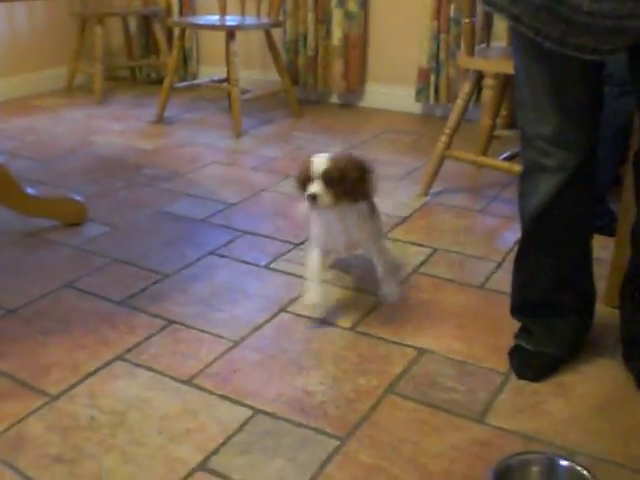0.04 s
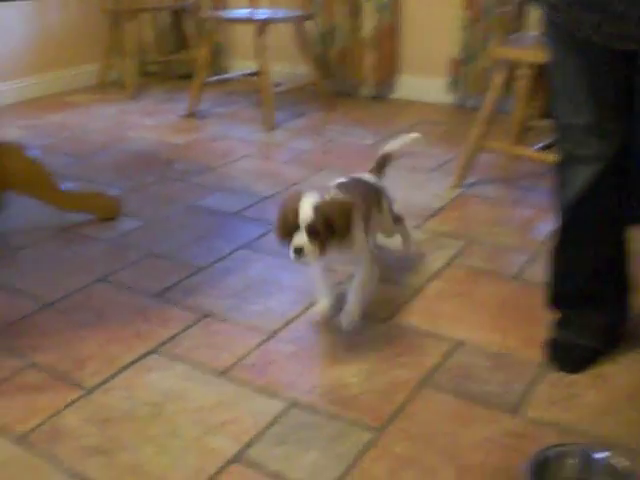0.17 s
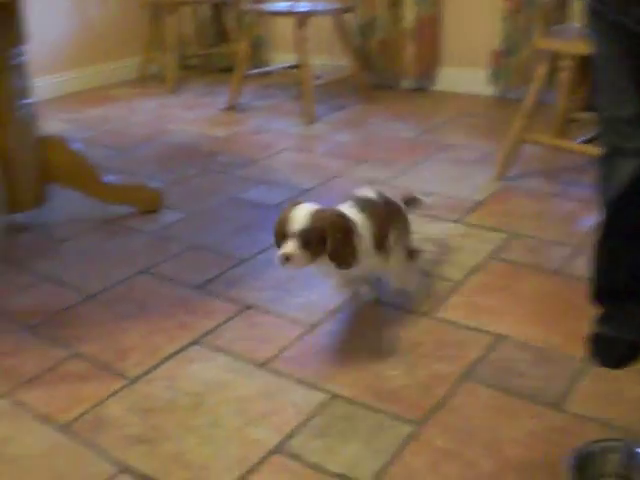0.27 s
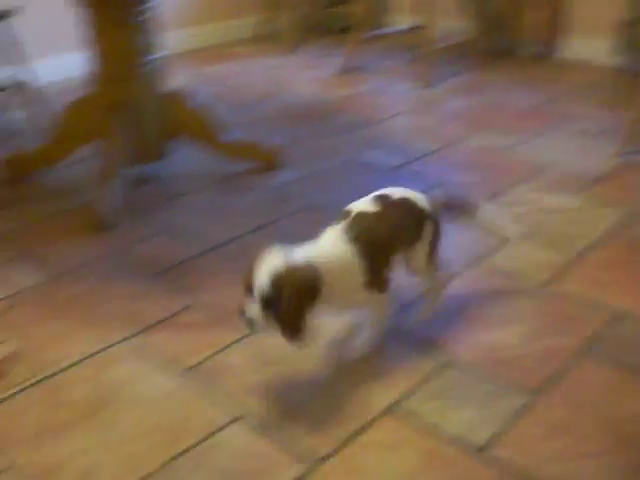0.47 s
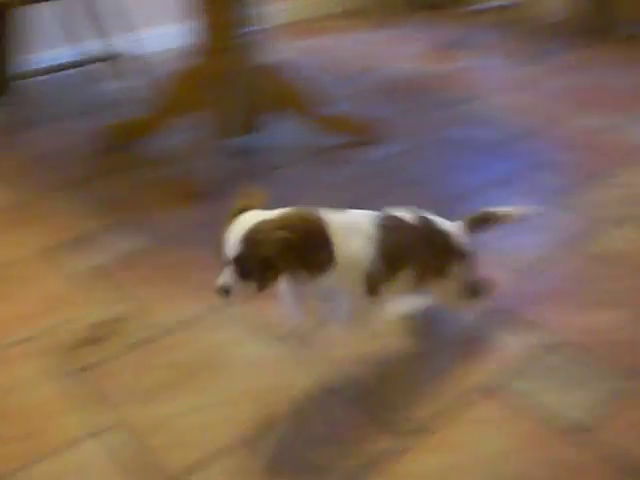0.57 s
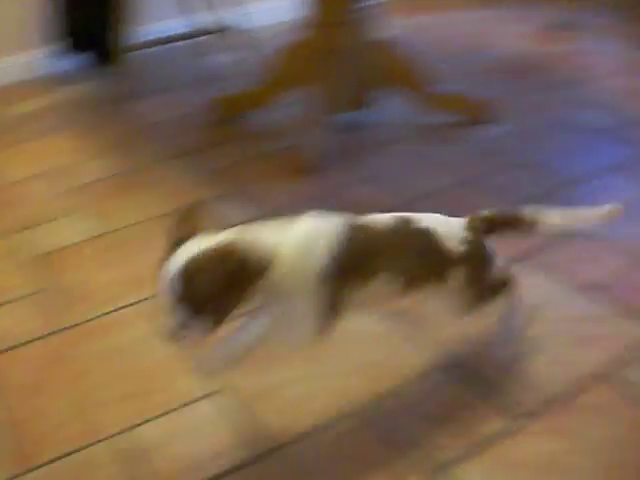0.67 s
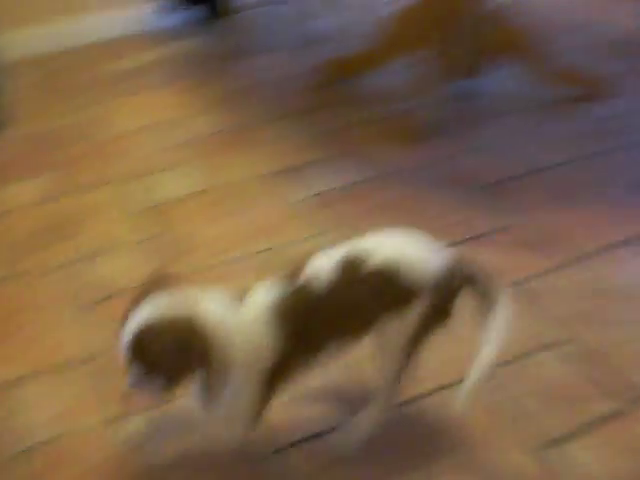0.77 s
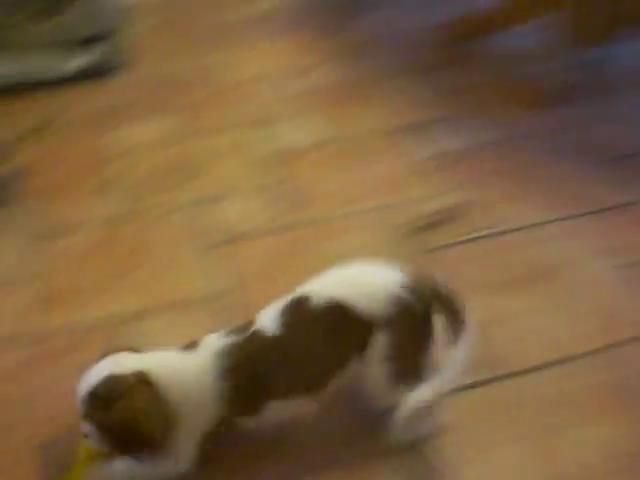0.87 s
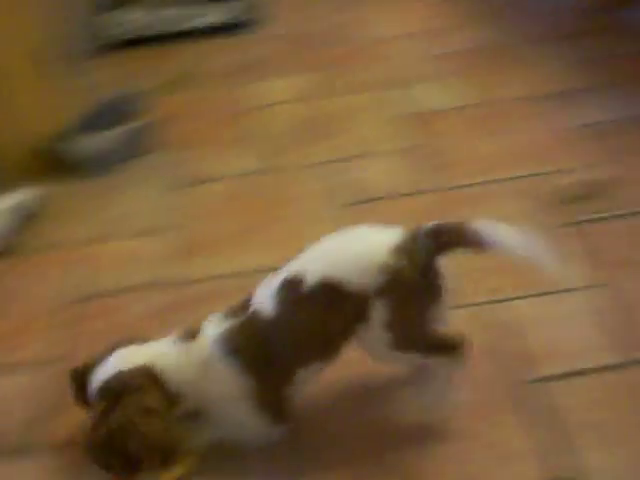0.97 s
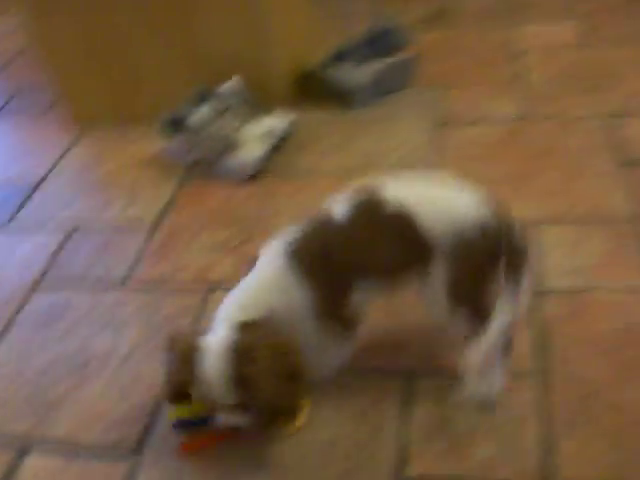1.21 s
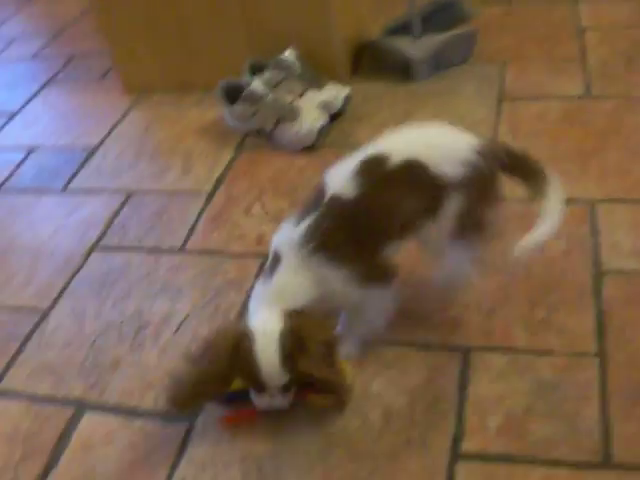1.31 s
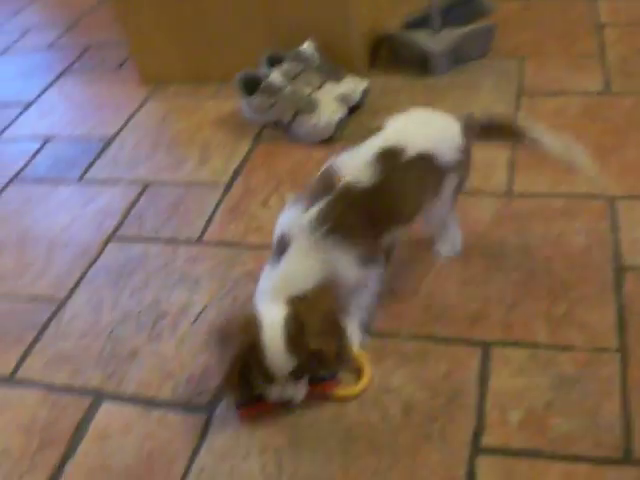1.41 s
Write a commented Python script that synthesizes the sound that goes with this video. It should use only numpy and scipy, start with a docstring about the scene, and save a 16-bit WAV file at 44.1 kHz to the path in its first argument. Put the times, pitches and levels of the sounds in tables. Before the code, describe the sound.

A bunch of keys jingles briefly in the air and lands on a tile floor with a sharp clatter that rings in the room. A puppy follows with soft paw thuds, skids and claw ticks, over a faint hum.

```python
"""Puppy chasing tossed keys

A bunch of keys, probably a plastic toy, jingles through the air and lands on kitchen tiles in a quick
run of hard clacks; the live room rings on. A puppy gives chase: paws thud and skid, claws tick, and
it noses the bunch over the floor. A small camera whines faintly close by."""
import sys
import numpy as np
from scipy import signal
from scipy.fft import rfft, irfft
from scipy.io import wavfile

SR = 44100
rng = np.random.default_rng(int(sys.argv[2]) if len(sys.argv) > 2 else 0)


def pcm_store(signal):
    """Save signal as 16-bit PCM."""
    levels = np.round(np.clip(np.atleast_2d(signal), -1, 1) * 32767)
    wavfile.write(sys.argv[1], SR, levels.astype(np.int16).T)


N = 63945


def undb(db):
    return 10 ** (np.asarray(db) / 20)


def since(start):
    """Seconds since start, zero before it."""
    return np.maximum(np.arange(N) / SR - start, 0)


def decay(start, seconds):
    """Envelope with an instant attack and an exponential tail, down to 1/e after `seconds`."""
    t = since(start)
    return (t > 0) * np.exp(-t / seconds)


def along(hz, points):
    """Read (Hz, value) points on a log-frequency axis."""
    freqs, values = np.array(sorted(points)).T
    return np.interp(np.log(np.maximum(hz, 1)), np.log(freqs), values)


def eq(x, points):
    """Minimum-phase EQ through (Hz, dB) points, scaled to keep the power of white noise."""
    size = 4096
    gain = undb(along(np.linspace(0, SR / 2, size // 2 + 1), points))
    cepstrum = irfft(np.log(gain))
    causal_fold = 1 + np.sign(size // 2 - np.arange(size))
    causal_fold[0] = 1
    impulse = irfft(np.exp(rfft(cepstrum * causal_fold)))
    return signal.fftconvolve(x, impulse / np.linalg.norm(impulse))[:N]


def noise():
    return rng.standard_normal(N)


def ring(start, hz, t60):
    """One struck mode; a small object radiates little below its pitch."""
    mode = np.sin(2 * np.pi * hz * since(start)) * decay(start, t60 / np.log(1000))
    return signal.lfilter(*signal.butter(2, hz / 4, "high", fs=SR), mode)


def grit(grains_per_s=8000):
    """Dense tiny contacts of uneven size, rms 1."""
    grains = (rng.random(N) < grains_per_s / SR) * noise()
    grains *= undb(np.minimum(rng.exponential(size=N), 3))  # each grain gets up to 3 dB extra
    return grains / grains.std()


# EQ of the room tone (frequency [Hz], gain [dB])
ROOM_TONE_EQ = [(25, -9), (60, -6.5), (115, -2.5), (165, -6), (260, -3.5), (700, -2), (1350, -9.5),
                (2100, -15), (2800, -9.5), (5300, -15.5), (7500, -14.5), (15500, -15)]
# Steady partials of the hum and whine (frequency [Hz], level [dB])
HUM_PARTIALS = [(120, -67.5), (242, -64.5), (1373, -69.5), (1464, -85)]

def ambience(room_tone_db=-52):
    """The bed: room tone with a faint hum and the camera's whine."""
    hum = sum(undb(db) * np.sqrt(2) * np.sin(2 * np.pi * (hz * since(0) + rng.random()))
              for hz, db in HUM_PARTIALS)
    return undb(room_tone_db) * eq(noise(), ROOM_TONE_EQ) + hum


# Soft footfalls and bumps (time [s], level [dB], band centre [Hz], decay [s])
PAW_THUDS = [(.004, -61, 48, .06), (0.014, -53, 193, 0.042), (.552, -50, 179, 0.036),
             (0.821, -47.5, 175, 0.036), (.85, -48.5, 84, 0.03), (.869, -35, 540, 0.013),
             (0.871, -42, 219, 0.037), (0.884, -38, 245, 0.017), (1.14, -58, 227, 0.037),
             (1.429, -52, 242, .018)]

def paw_thuds(attack_s=0.0017, edge_ratio=1.36):
    """Soft paws hit the floor, each a dull burst of low band-passed noise."""
    out = np.zeros(N)
    for start, db, hz, decay_s in PAW_THUDS:
        band = signal.butter(2, [hz / edge_ratio, hz * edge_ratio], "band", fs=SR, output="sos")
        body = signal.sosfilt(band, noise())
        envelope = (1 - np.exp(-since(start) / attack_s)) * decay(start, decay_s)
        out += undb(db) * body / body.std() * envelope
    return out


# Paws and keys sliding (time [s], length [s], scrape level [dB], hiss level [dB])
SKIDS = [(0.02, 0.034, -54.5, -46.5), (0.054, 0.07, -59, -43.5), (0.089, 0.042, -44.5, -52),
         (0.139, 0.078, -56.5, -44), (0.641, 0.052, -53.5, -51), (0.822, 0.055, -47, -42),
         (0.865, 0.069, -47, -38.5), (0.911, 0.055, -43, -53), (0.958, 0.084, -45.5, -47.5),
         (1.014, 0.06, -43, -41), (1.062, 0.15, -52.5, -48.5), (1.192, .11, -57.5, -51),
         (1.287, 0.08, -52.5, -51.5), (1.409, 0.1, -56.5, -54)]
# Midrange body of a skid (frequency [Hz], gain [dB])
SCRAPE_EQ = [(100, -10), (300, -6.5), (800, 0), (2300, 0), (5000, -5), (7500, -23), (15000, -42)]
# Airy top of a skid (frequency [Hz], gain [dB])
HISS_EQ = [(1000, -19), (4000, 1), (7000, -3.5), (10500, -0.5), (13000, -2), (15500, -0.5)]

def skids(attack_s=0.0079, release_s=0.024):
    """Friction on tile: a gritty scrape layered with a fine hiss, both riding each push."""
    scrape_envelope, hiss_envelope = np.zeros(N), np.zeros(N)
    for start, length, scrape_db, hiss_db in SKIDS:
        attack = 1 - np.exp(-since(start) / attack_s)
        release = np.exp(-since(start + length - release_s) / release_s)
        scrape_envelope += undb(scrape_db) * attack * release
        hiss_envelope += undb(hiss_db) * attack * release
    scrape = eq(scrape_envelope * grit(), SCRAPE_EQ)
    hiss = eq(hiss_envelope * (grit() + noise()) / np.sqrt(2), HISS_EQ)
    return scrape + hiss


# Keys touching in mid-air (time [s], level [dB], decay [s])
KEY_JINGLES = [(.0752, -27.5, 0.0034), (0.0785, -32, 0.0036), (.1438, -26, 0.0022)]
# Sparkle of the jingle (frequency [Hz], gain [dB])
JINGLE_EQ = [(3000, -22), (7000, -25), (9000, -7.5), (10700, -3.5), (13000, -12), (15500, -4)]

def key_jingles():
    """The flying keys brush each other in thin, bright rattles."""
    envelope = sum(undb(db) * decay(start, decay_s) for start, db, decay_s in KEY_JINGLES)
    return eq(grit() * envelope, JINGLE_EQ)


# Claws and keys tapping the floor (time [s], level [dB], pitch [Hz], crack offset [dB])
TILE_TICKS = [(.0985, -48, 900, -12), (.569, -35, 1460, -11), (.743, -32, 2040, -9), (.821, -34, 4540, 4),
              (.8232, -29, 3130, -16), (.873, -22, 2290, -13), (0.8988, -25, 3900, 12.5),
              (.903, -32, 3000, -3), (.9135, -23, 5940, -11), (.921, -25, 3400, 8), (1.0075, -28, 3200, -6),
              (1.016, -25, 2400, -2.5), (1.0312, -18.5, 2380, -8), (1.1095, -26, 1830, -12),
              (1.329, -35, 2980, -12), (1.4368, -28, 3280, -16)]
# Snap of a hard hit on tile, shared with the landing (frequency [Hz], gain [dB])
CRACK_EQ = [(100, -30.5), (600, -12), (1500, -1.5), (8000, 1), (11000, -3.5), (15500, -3)]

def tile_ticks(ring_t60_s=0.0034, crack_decay_s=0.0002):
    """Claws and keys make tiny hard contacts: a noise crack and a few cycles of ring."""
    rings, crack_envelope = np.zeros(N), np.zeros(N)
    for start, db, hz, crack_db in TILE_TICKS:
        rings += undb(db) * ring(start, hz, ring_t60_s)
        crack_envelope += undb(db + crack_db) * decay(start, crack_decay_s)
    return rings + eq(crack_envelope * noise(), CRACK_EQ)


# Keys striking the tile (time [s], level [dB], pitch [Hz], ring T60 [s], crack offset [dB])
KEY_CLACKS = [(0.2163, -13, 2600, 0.0008, -24), (0.2225, -10, 3720, 0.0021, -12),
              (0.2337, 3.5, 6720, 0.0029, -2), (0.2362, -16, 7030, 0.0023, 11),
              (0.2417, -5, 3400, 0.0057, -8), (0.2439, -12, 2840, 0.0067, -7),
              (.2481, -7.5, 6600, 0.0057, -12), (0.2511, -11, 3170, .006, -25),
              (0.2543, -11.5, 6200, 0.0052, 0)]
# Resonances of the bunch (frequency [Hz], relative level [dB], T60 [s])
BUNCH_MODES = [(1540, -29, 0.019), (2700, -9, .03), (3050, 15, 0.032), (3250, 13, 0.034), (3650, -14, .03),
               (3730, -18, .025), (5050, -12, .03), (6250, -9, .025), (6200, 14, 0.021), (8800, -16, .02),
               (9100, -11, .025)]
# EQ of the keys rattling together from the first touch on (frequency [Hz], gain [dB])
CHATTER_EQ = [(100, -19.5), (500, -5.5), (1300, 0), (3500, -0.5), (6000, -5.5), (9000, -3), (15500, -15)]
# Reverb-send EQ: what the hits throw into the room (frequency [Hz], gain [dB])
HIT_SEND_EQ = [(60, -31), (200, -13.5), (500, -14), (850, -7), (1220, -13.5), (1700, -8), (2000, -12.5),
               (2650, -3), (3300, 2), (3950, 2), (4700, -5.5), (5700, -2), (7500, -13.5), (9400, -5.5),
               (12000, -12.5), (15500, -20)]

def key_landing(crack_decay_s=0.00057, chatter_db=-24.5, chatter_decay_s=0.036,
                modes_db=-40.5, hit_send_db=8):
    """Each key cracks on the tile and rings briefly; the bunch chatters, resonates and fills the room."""
    rings, crack_envelope, hits = np.zeros(N), np.zeros(N), np.zeros(N)
    for start, db, hz, t60, crack_db in KEY_CLACKS:
        rings += undb(db) * ring(start, hz, t60)
        crack_envelope += undb(db + crack_db) * decay(start, crack_decay_s)
        hits[int(start * SR)] += undb(db)
    first_touch = KEY_CLACKS[0][0]
    chatter = undb(chatter_db) * eq(grit() * decay(first_touch, chatter_decay_s), CHATTER_EQ)
    modes = sum(undb(db) * ring(0, hz, t60) for hz, db, t60 in BUNCH_MODES)
    bunch = undb(modes_db) * signal.fftconvolve(hits, modes)[:N] + chatter
    cracks = eq(crack_envelope * noise(), CRACK_EQ)
    send = undb(hit_send_db) * eq(hits, HIT_SEND_EQ) + bunch
    return rings + cracks + bunch + kitchen_reverb(send)


# Length of the kitchen's tail (frequency [Hz], T60 [s])
REVERB_T60 = [(100, 0.37), (500, 1), (1400, 1), (3000, 0.67), (6000, 0.68), (10000, 0.47), (15000, 0.52)]

def kitchen_reverb(send, predelay_s=0.00091, build_s=0.021):
    """Diffuse reflections: energy builds and drains in each band, and the mids hang on longest."""
    edges = np.geomspace(50, 16500, 27)
    delayed = np.pad(send, (int(predelay_s * SR), 0))[:N]
    out = np.zeros(N)
    for low, high in zip(edges, edges[1:]):
        band = signal.butter(3, [low, high], "band", fs=SR, output="sos")
        energy = signal.sosfilt(band, delayed) ** 2
        drain_s = along(np.sqrt(low * high), REVERB_T60) / (2 * np.log(1000))
        for seconds in (build_s, drain_s):
            pole = np.exp(-1 / (seconds * SR))
            energy = signal.lfilter([1 - pole], [1, -pole], energy)
        wash = signal.sosfilt(band, noise())
        out += np.sqrt(energy) * wash / wash.std()
    return out


def scene(foley_reverb_db=-6):
    """Mono mix: the landing up front, the small moves and their reverb behind, ambience underneath."""
    foley = key_jingles() + tile_ticks() + paw_thuds() + skids()
    mix = key_landing() + foley + undb(foley_reverb_db) * kitchen_reverb(foley) + ambience()
    return mix[None]


# Narrow dips in the camera's treble (frequency [Hz], width [Hz])
CAMERA_NOTCHES = [(7290, 125), (7850, 230)]

def record(dry):
    """The camera soft-clips the loudest peak, notches two narrow bands and cuts the top."""
    x = np.tanh(dry)
    for hz, width in CAMERA_NOTCHES:
        x = signal.lfilter(*signal.iirnotch(hz, hz / width, fs=SR), x)
    high_cut = signal.ellip(10, .2, 70, 15720, fs=SR, output="sos")
    return signal.sosfilt(high_cut, x)


dry = scene()
out = record(dry)
pcm_store(out)
```